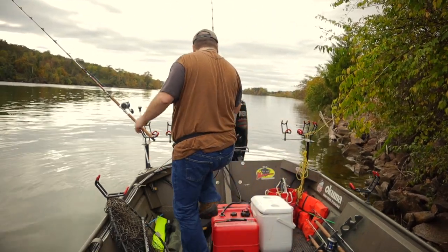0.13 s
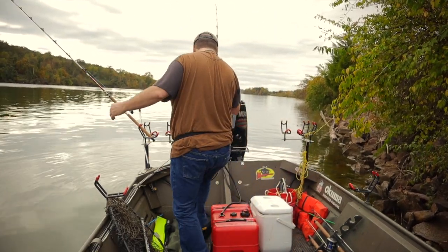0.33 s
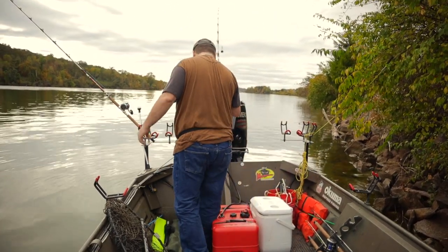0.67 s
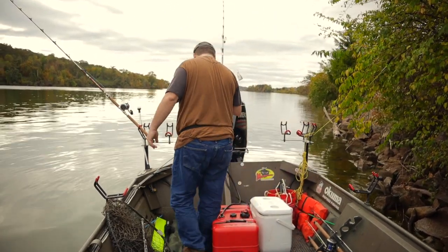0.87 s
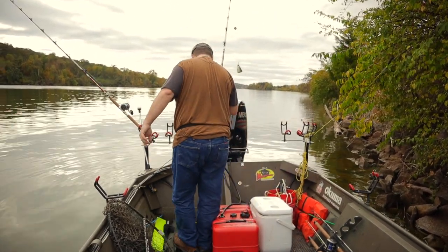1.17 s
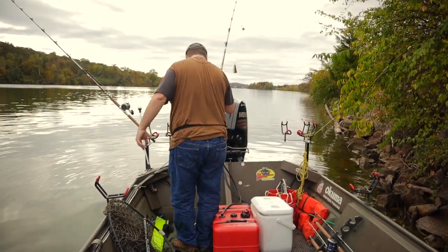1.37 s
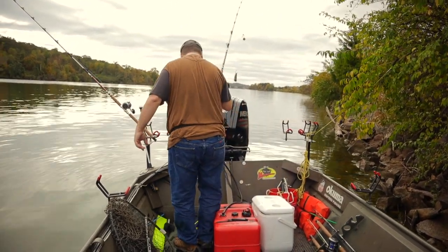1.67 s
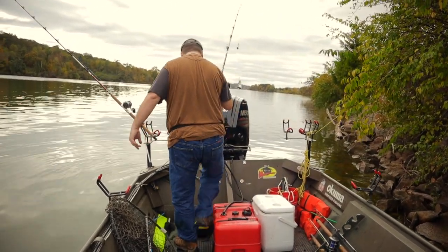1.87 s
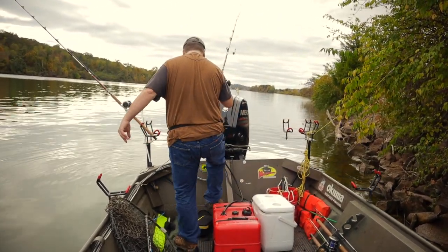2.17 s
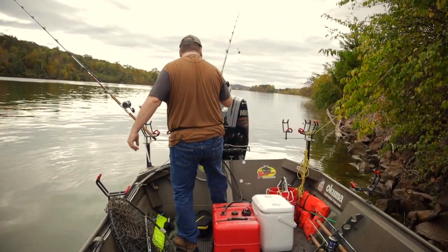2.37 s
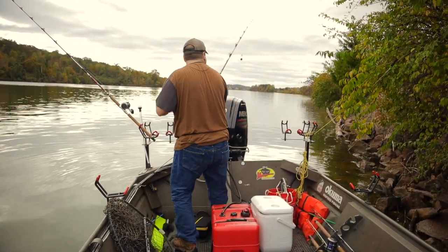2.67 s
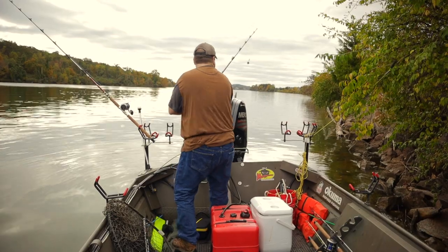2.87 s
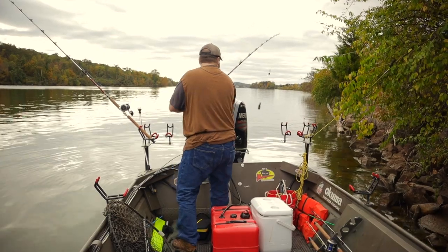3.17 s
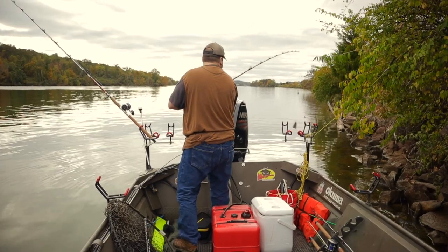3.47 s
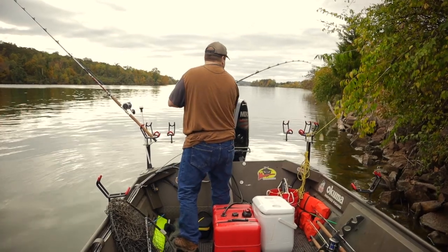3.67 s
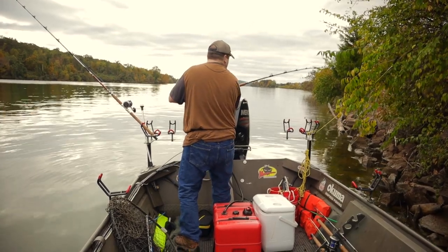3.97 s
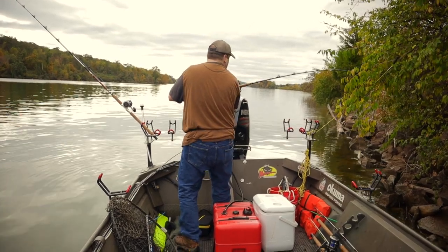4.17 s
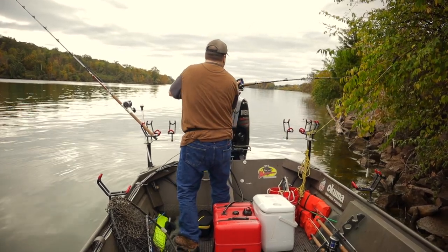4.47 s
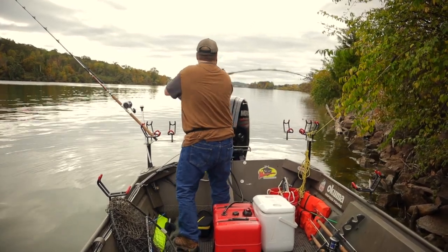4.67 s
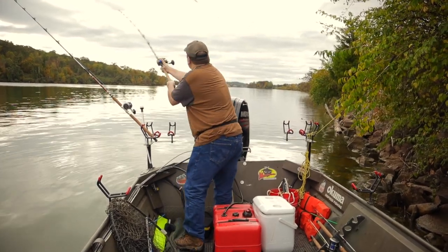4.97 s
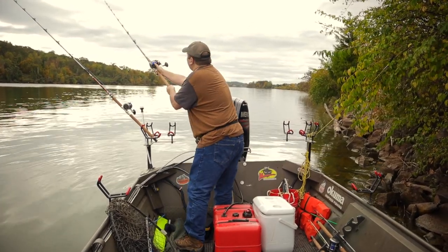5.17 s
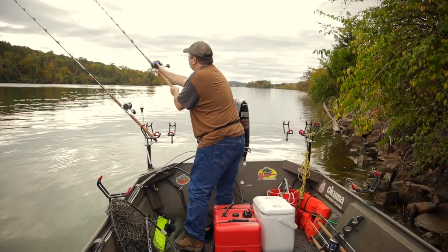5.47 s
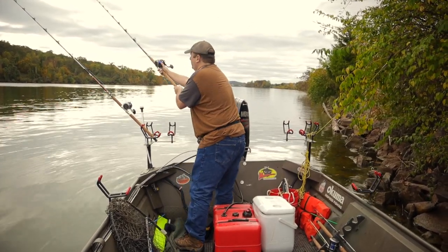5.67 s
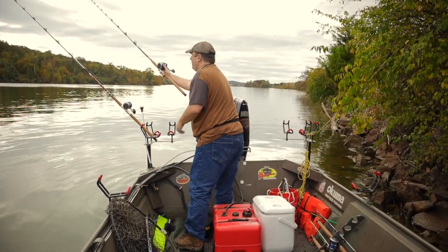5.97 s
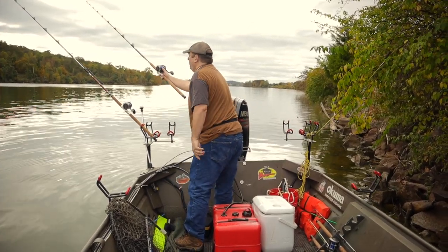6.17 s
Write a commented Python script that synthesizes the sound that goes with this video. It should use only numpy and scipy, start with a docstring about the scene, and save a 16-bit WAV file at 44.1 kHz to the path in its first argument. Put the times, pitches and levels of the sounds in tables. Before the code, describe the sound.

Faint, steady outdoor air lies over a calm river, heard close to an angler in an aluminum boat. Soft clothing rustle and small ticks lead to a boot booming on the hull at 0.6 seconds. Around 1 second, gear clacks sharply over another low step. At 1.15 seconds comes the loudest sound, one hard, hollow knock with a faint echo from the bank, then a smaller clack. Softer bumps and steps follow from 2 to 2.5 seconds, and a cluster of thumps and clacks at 2.7 to 2.9. It then stays quiet until about 4.7 seconds, when light bumps and a brief swish of clothing lead into a cast. From 5.1 seconds, line hisses softly off the reel with a thin, fluttering whine and tiny ticks against the rod guides, fading as the spool slows through the end, just past 6 seconds.

```python
"""A calm river with a wooded bank, heard in mono from close to an angler in an aluminium boat.
He steps about and his boots set the hull booming; gear clacks, something hollow takes one hard knock
and his clothes rustle. He lifts a rod and casts: line hisses off the slowing reel and flicks the guides.
Farther off, the bank answers the blows faintly over the quiet air."""
import sys
import numpy as np
from scipy import signal
from scipy.fft import irfft
from scipy.io import wavfile

SR = 44100
rng = np.random.default_rng(int(sys.argv[2]) if len(sys.argv) > 2 else 0)


def wrap_up_sound(samples):
    """Save the sound to the file named by the first command line argument, as 16-bit audio."""
    columns = np.atleast_2d(samples).T
    # keep every value between -1 and 1, then stretch to whole-number steps
    tamed = np.clip(columns, -1, 1)
    steps = np.round(tamed * 32767).astype(np.int16)
    wavfile.write(sys.argv[1], SR, steps)


N = 278712
TIME = np.arange(N) / SR
KNOCK_S, KNOCK_DB = 1.1468, -13.5

# Weight landing on the deck, the band of modes it excites and the extra damping by the sole:
# start_s, level_db, centre_hz, spread_octaves, damping_db_per_s
FOOTFALLS = [(.596, -22, 143, 1.36, 12), (.612, -34.5, 202, .54, 17), (.964, -24, 168, 0.69, 20),
             (1.006, -29.5, 88, .4, -2), (1.074, -37, 139, 0.68, 50), (1.147, -29.5, 173, 0.59, 18),
             (2.084, -50.5, 148, .4, 101), (2.417, -29, 134, .48, 122), (2.512, -31.5, 136, 0.74, 120),
             (2.711, -30, 115, 0.99, 50), (2.721, -37, 420, 0.41, 97), (2.76, -29.5, 94, 0.42, 44),
             (2.829, -36, 98, 1.08, -3), (4.941, -52.5, 148, 0.62, 50), (5.017, -48.5, 105, 0.69, 50)]


def from_db(db):
    """Decibels as an amplitude gain."""
    return 10 ** (np.asarray(db) / 20)


def unit_rms(x):
    """The signal scaled to rms 1."""
    return x / np.sqrt(np.mean(x ** 2) + 1e-20)


def at_hz(points, hz):
    """Reads a table along a log-frequency axis."""
    point_hz, values = np.transpose(points)
    return np.interp(np.log(hz), np.log(point_hz), values)


def noise(colour, size=N):
    """Noise of rms 1 whose spectrum has the shape colour(hz), in dB."""
    hz = np.fft.rfftfreq(size, 1 / SR) + 1e-3
    phases = np.exp(2j * np.pi * rng.random(len(hz)))
    return unit_rms(irfft(from_db(colour(hz)) * phases, size))


def drift(rate_hz):
    """A random wander of rms 1, mostly slower than rate_hz."""
    return noise(lambda hz: -20 * np.log10(1 + (hz / rate_hz) ** 2))


def add(track, start_s, sound):
    """Lays a sound into the track at start_s."""
    start = max(round(start_s * SR), 0)
    track[start:start + len(sound)] += sound[:N - start]


def ring(modes, gains, t, scatter_rad=1.0):
    """Decaying sines set off by one blow, each reaching the microphone slightly out of step."""
    phases = rng.normal(0, scatter_rad, len(modes))
    return sum(gain * from_db(db - 60 * t / t60) * np.sin(2 * np.pi * hz * t + phase)
               for (hz, db, t60), gain, phase in zip(modes, gains, phases))


def river_air(level_db=-61.5, waver_db=0.2):
    """The steady wash of the open river."""
    # Spectrum of the air: frequency_hz, relative_db
    spectrum = [(20, -22), (45, -4.5), (70, -10), (100, -1.5), (135, -5.5), (175, -3), (260, -6), (450, -9),
                (650, -7.5), (1300, -11), (2000, -19), (3000, -27), (6000, -30.5), (15500, -33.5)]
    return from_db(level_db + waver_db * drift(rate_hz=2)) * noise(lambda hz: at_hz(spectrum, hz))


def bank_reflections(blows, tail_db=-19, build_s=0.0034):
    """A few dull echoes from close by, then scatter from the trees that dies first around 5 kHz."""
    # How long the wooded bank rings: frequency_hz, t60_s
    decay = [(100, 1.23), (500, 0.69), (1500, 0.7), (5000, 0.1), (14000, 0.6)]
    # Near reflections: delay_s, level_db
    echoes = [(.041, -28.5), (0.058, -25.5), (.1, -47)]
    t, tail = TIME[:SR], 0
    edges_hz = 60 * 2 ** np.arange(9)
    for low, high in zip(edges_hz, edges_hz[1:]):
        octave = signal.butter(2, [low, high], "band", fs=SR, output="sos")
        band = signal.sosfilt(octave, rng.standard_normal(SR))
        tail = tail + band * from_db(-60 * t / at_hz(decay, np.sqrt(low * high)))
    response = from_db(tail_db) * unit_rms(tail * (1 - np.exp(-t / build_s))) / np.sqrt(SR)
    dull_pulse = np.hanning(21) / 10
    for delay_s, db in echoes:
        add(response, delay_s, from_db(db) * dull_pulse)
    return signal.fftconvolve(blows, response)[:N]


def rubbing(rise_db_per_s=115, fall_db_per_s=145, briskness=0.53, settle_db=-12, settle_db_per_s=36):
    """Gain of the rustle: each move swells, holds and stops, faster if stronger; then the cloth settles."""
    # The angler's moves, rubbing sleeves and trousers: start_s, end_s, level_db
    moves = [(0, 0.278, -56), (0.52, 0.635, -59), (0.827, 0.968, -60), (1.109, 1.126, -38.5),
             (1.267, 1.325, -46.5), (1.853, 2.104, -57.5), (2.628, 2.73, -51.5), (2.84, 3.0, -59.5),
             (4.712, 4.9, -68), (4.997, 5.029, -47)]
    power = 0
    for start_s, end_s, db in moves:
        pace = from_db(briskness * (db + 55))   # scales rise and fall; 1 for a move at -55 dB
        before_s, after_s = np.maximum(start_s - TIME, 0), np.maximum(TIME - end_s, 0)
        swell_db = -pace * rise_db_per_s * before_s
        release_db = np.maximum(-pace * fall_db_per_s * after_s, settle_db - settle_db_per_s * after_s)
        power = power + from_db(np.maximum(db + swell_db + release_db, -200)) ** 2
    return np.sqrt(power)


def clothes(grain_db=2.0, grain_hz=250, fold_db=1.4, fold_hz=30):
    """Fabric catches and slips: fine grain inside slower folds."""
    # Spectrum of rubbing cloth: frequency_hz, relative_db
    spectrum = [(80, 3.5), (200, 8), (450, 4), (1200, -3.5), (2500, -8.5), (5000, -13.5), (7200, -15.5),
                (8900, -14.5), (10500, -26.5), (16000, -29.5)]
    texture = from_db(grain_db * drift(grain_hz) + fold_db * drift(fold_hz))
    return rubbing() * unit_rms(noise(lambda hz: at_hz(spectrum, hz)) * texture)


def contact(db, centre_hz, treble_db_per_octave, t60_s, bass_db_per_octave=10, knee_octaves=0.32):
    """One contact rings a dense, uneven cluster of short modes: a noise burst shaped around centre_hz."""
    # Colour common to all contacts in the boat: frequency_hz, relative_db
    spectrum = [(60, -3), (250, 6), (430, 5.5), (700, 1), (1000, 0.5), (1350, 0), (2200, -1), (5000, -5.5),
                (8500, -3.5), (10500, -12), (16000, -21.5)]
    t = TIME[:SR // 4]
    mode_hz = np.geomspace(200, 16000, num=70)
    ripple = np.column_stack([mode_hz, rng.normal(0, 3.0, len(mode_hz))])

    def colour(hz):
        octaves = np.log2(hz / centre_hz)
        slope = np.where(octaves > 0, treble_db_per_octave, bass_db_per_octave)
        fall_db = slope * (np.hypot(octaves, knee_octaves) - knee_octaves)
        # a dull contact lasts longer and loses the top, from 3.3 octaves above its centre
        softness_db = 20 * np.log10(1 + (hz / centre_hz / 2 ** 3.3) ** 2)
        return at_hz(spectrum, hz) + at_hz(ripple, hz) - fall_db - softness_db
    onset = 1 - np.exp(-t / (0.011 * t60_s))   # short ticks start sharpest
    return noise(colour, size=len(t)) * from_db(db - 60 * t / t60_s) * onset


def loose_gear(count=3, within_s=0.26, relative_db=-28, fade_db_per_s=35, spread_octaves=0.76):
    """Each footfall shakes faint ticks out of the gear lying about; a damping sole quiets them sooner."""
    out = np.zeros(N)
    for start_s, db, *_, damping_db_per_s in FOOTFALLS:
        for when, pitch in rng.random((count, 2)):
            delay_s = when * within_s
            centre_hz = 2000 * 2 ** (spread_octaves * (2 * pitch - 1))
            tick_db = db + relative_db - (fade_db_per_s + damping_db_per_s) * delay_s
            add(out, start_s + delay_s, contact(tick_db, centre_hz, treble_db_per_octave=9, t60_s=0.051))
    return out


def bumps_and_clicks(bump_hz=453):
    """Bumps share one dull pitch and vary in softness and length; clicks are short and vary in pitch."""
    # Boots and rod butt against the boat: start_s, level_db, treble_db_per_octave, t60_s
    bumps = [(.282, -45.5, 2.5, 0.066), (.299, -42, 6, 0.076), (.496, -32, 11, 0.049),
             (.596, -28, 6, 0.057), (.613, -32, 7, 0.13), (0.634, -38.5, 2.5, 0.029),
             (1.365, -43.5, 20, 0.23), (1.9476, -40, 16, 0.052), (2.086, -46.5, 8, .075),
             (2.418, -45.5, 17, 0.36), (2.511, -45, 17, .2), (2.719, -22.5, 15, 0.063),
             (2.755, -36.5, 5.5, .27), (2.782, -31, 22, 0.15), (2.825, -39.5, 1.5, 0.11),
             (2.893, -42, 1.5, 0.041), (4.7, -54, 16, 0.46), (4.92, -36, 5, 0.04), (4.941, -36, 5, 0.035),
             (5.015, -41, 30, 0.065), (5.07, -42.5, 8.5, 0.051), (5.131, -45, 4.5, 0.083)]
    # Bright clicks of rod and tackle: start_s, level_db, centre_hz
    clicks = [(.074, -53, 2700), (0.2173, -52.5, 1250), (0.78, -59, 2610), (.94, -45.5, 1410),
              (.9633, -24.5, 800), (0.984, -26.5, 1530), (.986, -35, 5300), (1.069, -40, 970),
              (1.352, -36, 1090), (2.03, -52.5, 3430), (2.429, -61.5, 4970), (2.709, -29, 1370),
              (2.713, -43.5, 2700), (2.722, -47.5, 10000), (2.83, -37.5, 3420), (2.937, -54.5, 7460),
              (3.156, -52.5, 1330), (4.472, -66, 7900), (4.769, -50, 940), (4.986, -53, 1000),
              (5.385, -49, 3320)]
    out = np.zeros(N)
    for start_s, db, treble_db_per_octave, t60_s in bumps:
        add(out, start_s, contact(db, bump_hz, treble_db_per_octave, t60_s))
    for start_s, db, centre_hz in clicks:
        add(out, start_s, contact(db, centre_hz, treble_db_per_octave=12, t60_s=0.077))
    return out


def hull(rise_s=0.0017, floor_db=-24, drum_db=-7, drum_t60_s=0.21, flex_hz=26, flex_t60_s=2.33):
    """Each footfall favours some panel modes; lesser panels drum along and the whole hull flexes slowly."""
    # Modes of the deck and hull panels: pitch_hz, level_db, t60_s
    modes = [(56.2, 0, 0.94), (63.6, -31, 0.52), (70.3, -1, 0.72), (80.5, -5.5, 0.31), (94, 5, 0.21),
             (116.2, -4, 0.489), (131.9, 4, 0.3), (154, -6.5, 0.544), (174.9, 0.5, 0.32), (203.1, -1, 0.4),
             (235.8, -3.5, 0.57), (273, 4, 0.15), (300.4, 3, 0.39), (338, -8.5, 0.56), (410, -11, 0.08),
             (435, -13, 0.14)]
    mode_hz, mode_db, _ = np.transpose(modes)
    out, t = np.zeros(N), TIME[:SR]
    flex_envelope = from_db(-25 - 60 * t / flex_t60_s) * (1 - np.exp(-t * flex_hz))
    flex = np.sin(2 * np.pi * flex_hz * t) * flex_envelope
    for start_s, db, centre_hz, spread_octaves, damping_db_per_s in FOOTFALLS:
        favour_db = lambda hz: -6 * (np.log2(hz / centre_hz) / spread_octaves) ** 2
        gains = from_db(favour_db(mode_hz)) + from_db(floor_db)
        boom = ring(modes, gains, t) * np.sqrt(2) / np.linalg.norm(gains * from_db(mode_db))
        drum = noise(favour_db, size=SR) * from_db(drum_db - 60 * t / drum_t60_s)
        envelope = (1 - np.exp(-t / rise_s)) * from_db(-damping_db_per_s * t)
        # a panel radiates little below its own modes
        low_cut_hz = 0.68 * centre_hz / 2 ** (spread_octaves / 2)
        radiation = signal.butter(2, low_cut_hz, "high", fs=SR, output="sos")
        panels = signal.sosfilt(radiation, (boom + drum) * envelope)
        add(out, start_s, from_db(db) * (panels + flex))
    return out


def crack_and_rebounds(count=3, rebound_s=0.042, first_db=-19, loss_db=8):
    """The hard knock opens with a bright crack and a splinter of treble, then rebounds ever more weakly."""
    out = np.zeros(N)
    crack = contact(KNOCK_DB - 10, centre_hz=1065, treble_db_per_octave=3.5, t60_s=0.045)
    splinter = contact(KNOCK_DB - 17.5, centre_hz=4080, treble_db_per_octave=7, t60_s=0.069)
    add(out, KNOCK_S, crack)
    add(out, KNOCK_S + 0.004, splinter)
    for k in range(count):
        db = KNOCK_DB + first_db - k * loss_db
        rebound = contact(db, centre_hz=507, treble_db_per_octave=22, t60_s=0.15)
        add(out, KNOCK_S + (k + 1) * rebound_s, rebound)
    return out


def hollow_knock(lowest_t60_s=0.105, damping_slope=0.58, rise_s=0.0024):
    """A hard blow on a hollow, well damped body: the higher a mode, the sooner it dies."""
    # Modes of the hollow body: pitch_hz, level_db
    body = [(315, -7), (362, -2), (408, -2), (458, 2), (520, 4), (578, -18), (865, -2), (910, -7),
            (1062, 2.5), (1486, -14), (1865, -7.5), (2148, -30.5), (2385, -9.5), (2680, -23), (3860, -12)]
    out, t = np.zeros(N), TIME[:SR // 2]
    lowest_hz = body[0][0]
    modes = [(hz, db, lowest_t60_s * (lowest_hz / hz) ** damping_slope) for hz, db in body]
    onset = 1 - np.exp(-t / rise_s)
    add(out, KNOCK_S, from_db(KNOCK_DB) * ring(modes, np.ones(len(modes)), t) * onset)
    return out


def line_flicks(count=5, first_s=5.15, every_s=0.204, jitter_s=0.0088, db=-61, t60_s=0.04):
    """Tiny ticks near 14 kHz as loose coils of line flick the rod guides, a few times a second."""
    out, t = np.zeros(N), TIME[:SR // 8]
    for k, late_s in enumerate(jitter_s * rng.standard_normal(count)):
        tick = noise(lambda hz: -20 * np.log10(1 + ((hz - 14000) / 1900) ** 2), size=len(t))
        add(out, first_s + k * every_s + late_s, tick * from_db(db - 60 * t / t60_s))
    return out


def spool_speed(release_s=5.105, spin_up_s=0.054, slowing_s=1.22):
    """Share of full speed: the lure yanks the spool into a spin, then it coasts down."""
    t = np.maximum(TIME - release_s, 0)
    return (1 - np.exp(-t / spin_up_s)) * np.exp(-t / slowing_s)


def reel(full_speed_hz=262, full_speed_db=-51, flutter_depth=0.18, waver_db=1.72, waver_hz=50):
    """Line rubs off the spool through the reel's resonances, fluttering once a turn, fading as it slows."""
    # Spectrum of the rubbing line: frequency_hz, relative_db
    spectrum = [(250, -31), (700, -2), (1400, -1.5), (2100, -5), (3600, -6.5), (5300, 2.5), (6800, -2.5),
                (8300, -2), (10000, -16), (14000, -18), (16000, -26)]
    # Resonances of the reel: centre_hz, width_hz, lift_db
    resonances = [(1146, 220, 8), (2970, 900, 7.5), (4160, 190, 6), (4800, 110, 9), (4980, 73, 2.5),
                  (5340, 104, 6.5), (5900, 140, 6), (7570, 160, 4)]
    # many narrow, lesser resonances give the hiss a thin whine
    whine_hz = np.arange(2500, 10000, 55)
    whine_db = rng.normal(0, 1.8, len(whine_hz))

    def colour(hz):
        lift_db = sum(db / (1 + (2 * (hz - centre) / width) ** 2) for centre, width, db in resonances)
        return at_hz(spectrum, hz) + lift_db + np.interp(hz, whine_hz, whine_db, left=0, right=0)
    speed = spool_speed()
    turns = np.cumsum(full_speed_hz * speed) / SR
    flutter = 1 + flutter_depth * np.sin(2 * np.pi * turns)
    return speed * noise(colour) * flutter * from_db(full_speed_db + waver_db * drift(waver_hz))


def scene(knock_send_db=-4):
    """At the microphone: blows and their reflections, the angler's clothes, the cast and the air."""
    blows = hull() + bumps_and_clicks() + loose_gear() + crack_and_rebounds()
    knock = hollow_knock()
    reflected = bank_reflections(blows + from_db(knock_send_db) * knock)
    return (blows + knock + reflected + clothes() + reel() + line_flicks() + river_air())[None]


def record(dry):
    """The treble is cut steeply above 15.7 kHz."""
    return signal.sosfilt(signal.ellip(12, 0.1, 80, 15700, fs=SR, output="sos"), dry)


dry = scene()
out = record(dry)
wrap_up_sound(out)
```